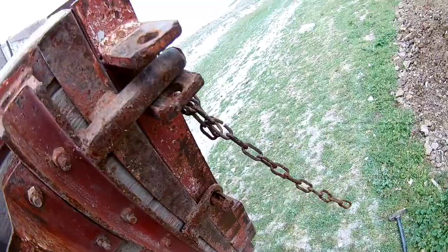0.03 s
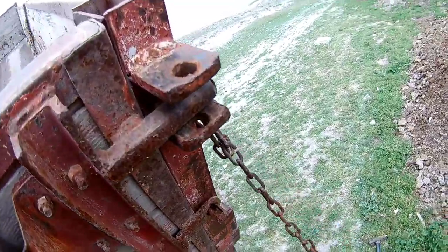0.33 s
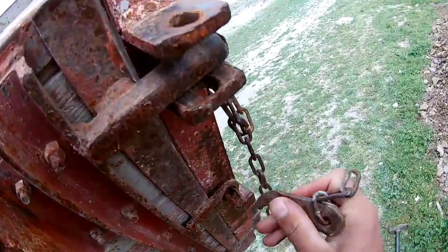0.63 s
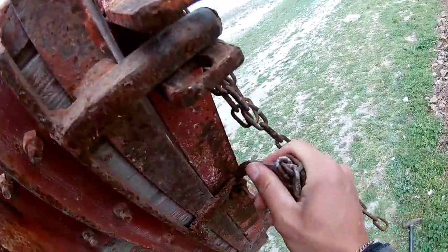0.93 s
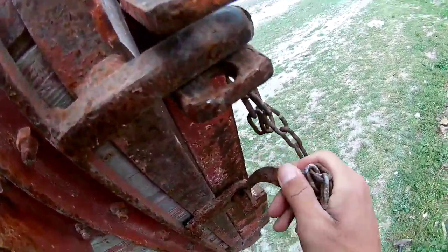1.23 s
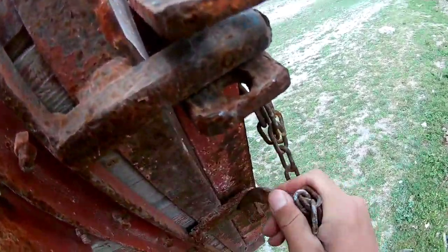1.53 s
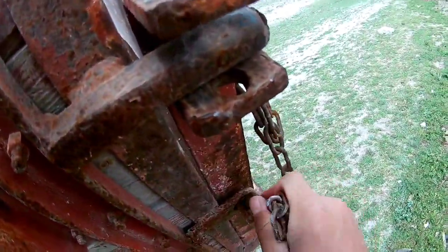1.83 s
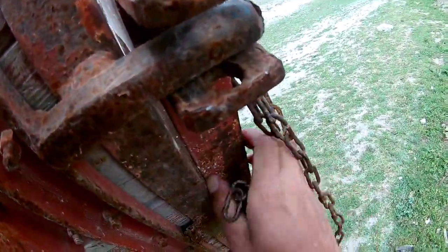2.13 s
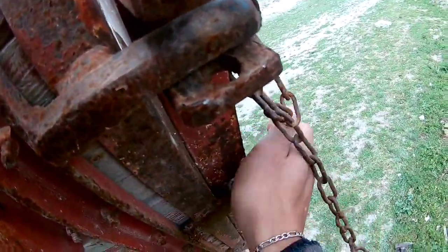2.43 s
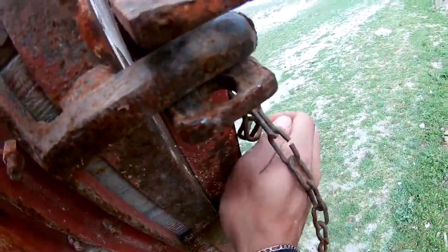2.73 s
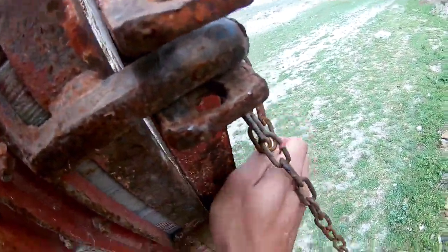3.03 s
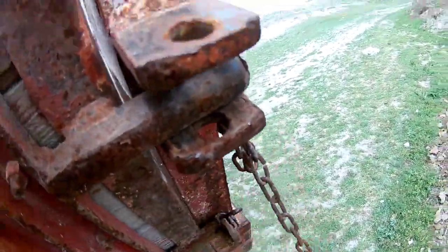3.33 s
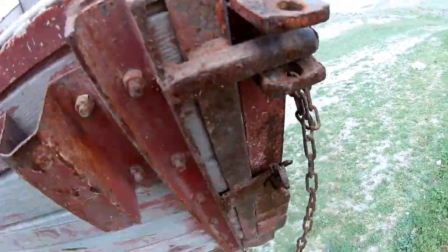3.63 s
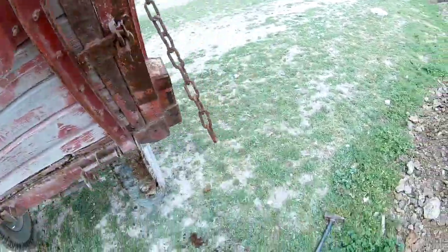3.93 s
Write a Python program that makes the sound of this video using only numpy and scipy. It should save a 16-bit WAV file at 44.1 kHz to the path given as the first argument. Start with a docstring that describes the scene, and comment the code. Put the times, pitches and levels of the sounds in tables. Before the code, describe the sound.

A rusty hook and chain clank against a steel trailer, close by outdoors. Links clink faintly at first, then knocks begin near 0.9 seconds, with sharp ringing clanks at 1.7 and 2 seconds. Gritty scrapes and ticks follow, then duller knocks from 2.7 to 3.1 seconds and a last clink at 3.6. Wind buffets the microphone throughout, thumping hardest near the end, while a distant engine idles faintly.

```python
"""Loose chain links clink faintly in the wind, outdoors at a steel farm trailer.
Close to the microphone, a rusty hook on the chain is worked into its fastening:
it knocks and scrapes on the frame, which rings. Gusts buffet the microphone
throughout, and an engine idles some way off."""
import sys
import numpy as np
from scipy import signal
from scipy.fft import rfft, irfft
from scipy.io import wavfile

SR = 44100
rng = np.random.default_rng(int(sys.argv[2]) if len(sys.argv) > 2 else 0)


def to_wav(sig):
    """Store sig (one row per channel, or 1-D mono) as 16-bit WAV at the path in sys.argv[1].

    Samples outside -1..1 are clipped; the rate is SR.
    """
    pcm = np.clip(np.atleast_2d(sig), -1, 1) * 32767
    pcm = np.round(pcm).astype(np.int16)
    wavfile.write(sys.argv[1], SR, pcm.T)  # frames by channels


N = 176400
T = np.arange(N) / SR
RING_T = T[:N // 6]  # time within one contact's sound


# Hook on the trailer frame, close by: start_s, body_db, ring_db, bite_db, air_db
HOOK_KNOCKS = [(0.8904, -35.5, -30, -44, -70), (1.137, -33, -33.5, -54, -88),
               (1.4691, -41.5, -38.5, -44, -63), (1.6909, -27, -19.5, -25, -56),
               (1.756, -33, -40.5, -38, -53), (1.803, -41, -48, -52.5, -85), (1.981, -51, -38, -45, -79),
               (1.9982, -37, -18, -22.5, -42.5), (2.0005, -25.5, -26.5, -23.5, -49),
               (2.347, -52, -45.5, -42.5, -61), (2.523, -50, -49, -54.5, -66.5),
               (2.622, -50.5, -48.5, -53.5, -71.5), (2.727, -27.5, -28.5, -44, -64),
               (2.7342, -24.5, -29, -37, -57), (2.866, -25, -31.5, -38, -58),
               (2.9172, -33, -32.5, -44, -71), (2.9235, -20, -27.5, -36, -54.5),
               (2.932, -27, -31, -40, -77), (3.066, -48.5, -51, -51, -69),
               (3.1215, -26, -32.5, -42.5, -56.5)]
# The hook sings on after knocks; the last row is a short chain clink near 3 kHz,
# sounding with the last rust tick: start_s, pitch_hz, level_db, t60_s
SINGLE_MODES = [(.892, 1722, -40, .3), (1.138, 1722, -37, .36), (1.14, 6490, -79, 1.2),
                (1.471, 1722, -43, .4), (1.692, 1722, -28.5, .24), (1.692, 12580, -47, .06),
                (1.757, 12580, -47, .07), (2.001, 1722, -29, .2), (2.001, 1135, -22, .06),
                (2.868, 1722, -28, .13), (2.868, 782, -41, .3), (3.124, 3424, -60, .45),
                (3.639, 3010, -32, .018)]
def hook():
    """The hook knocks against the frame and sometimes sings on; its chain gives one last short clink."""
    out = np.zeros(N)
    for start_s, *levels_db in HOOK_KNOCKS:
        add(out, start_s, clank(*levels_db))
    for start_s, pitch_hz, level_db, t60_s in SINGLE_MODES:
        add(out, start_s, ring([(pitch_hz, level_db, t60_s)], spread_db=0))
    return out


# Bands of one blow, from body up to air: low_hz, high_hz, trim_db, crash_t60_s, tail_db, tail_t60_s
BLOW_BANDS = [(425, 970, -5.5, 0.1, -4.5, 0.56), (990, 1440, -3, .06, -9, 0.29),
              (1450, 2270, -2.5, 0.049, -15.5, .28), (2350, 3700, -11.5, 0.049, -20.5, 0.19),
              (3500, 4400, -3.5, 0.031, -22, 0.3), (4334, 6500, -9.5, 0.02, -27.5, .2),
              (8150, 13400, -1.5, .035, -25.5, .15)]
# Modes of the hook and steel frame: pitch_hz, relative_db, t60_s
FRAME_MODES = [(468, -8, .15), (542, -10, .3), (590, -6, .12), (779, -6, .3), (845, -6, .09), (920, -8, .2),
               (1140, -3, .08), (1228, -5, .05), (1314, -7, .06), (1495, -9, .1), (1640, -6, .05),
               (1722, -1, .09), (1960, -3, .06), (2160, -6, .06), (2454, -2, .055), (2677, -7, .08),
               (2841, -7, .075), (3850, -3, .035), (3966, 0, .045), (4070, -3, .035), (4911, -9, .07),
               (11000, -5, .03), (12580, -5, .04)]
def clank(body_db, ring_db, bite_db, air_db, swell_s=0.001554, chatter_s=0.0011, crash_db=-1):
    """One blow: rusty faces chatter briefly, then clear modes ring over a crash of dense ones."""
    out = np.zeros(len(RING_T))
    swell = 1 - np.exp(-RING_T / swell_s)
    levels_db = body_db, body_db, ring_db, ring_db, bite_db, bite_db, air_db
    for level_db, blow_band in zip(levels_db, BLOW_BANDS):
        low_hz, high_hz, trim_db, crash_t60_s, tail_db, tail_t60_s = blow_band
        dense = rms_one(band(rng.standard_normal(len(RING_T)), low_hz, high_hz, order=3))
        decay = fade(crash_t60_s, hold_s=chatter_s) + from_db(tail_db) * fade(tail_t60_s)
        modes = [mode for mode in FRAME_MODES if low_hz < mode[0] < high_hz]
        clear = ring(modes, spread_db=7, shift_bandwidths=0.35)  # each contact loads them differently
        blow = swell * (clear + from_db(crash_db) * dense * decay)
        attack_rms = np.std(blow[:SR // 60])
        out += from_db(level_db + trim_db) * blow / attack_rms
    return out


# The hook drags over rust, close by: start_s, end_s, level_db, relative_bite_db
HOOK_SCRAPES = [(1.905, 1.987, -45.5, -16.5), (2.065, 2.117, -36, -13.5), (2.164, 2.327, -52, -12),
                (2.344, 2.417, -42.5, -7.5), (2.751, 2.812, -45, -6), (2.87, 2.913, -45.5, -4.5),
                (2.935, 2.995, -52, -9), (3.131, 3.172, -62, -9)]
def scraping(contacts=4, grains_per_s=450, spread_db=3.5, rise_s=0.02):
    """Grains of rust catch and slip at several contact points; each slip is a tiny damped blow."""
    out = np.zeros(N)
    for start_s, end_s, level_db, bite_db in HOOK_SCRAPES:
        size = int((end_s - start_s) * SR)
        pressure = np.minimum(T[:size] / rise_s, 1)
        drag = 0
        for _ in range(contacts):
            blow = clank(body_db=3.5, ring_db=0, bite_db=bite_db, air_db=bite_db - 19.5)
            damped = blow * fade(t60_s=0.04)  # pressed faces damp each other
            slips = rng.random(size) < grains_per_s / contacts / SR
            grains = slips * rng.choice([-1, 1], size) * from_db(spread_db * rng.standard_normal(size))
            drag = drag + signal.fftconvolve(grains * pressure, damped)
        drag_rms = np.sqrt(np.sum(drag ** 2) / size) + 1e-9
        add(out, start_s, from_db(level_db) * drag / drag_rms)
    return out


# Link taps link, close by: start_s, level_db, upper_relative_db, pitch_hz, t60_s
LINK_CLINKS = [(.026, -60.5, 1, 5050, 0.089), (.074, -60.5, 13, 5170, 0.044), (.374, -45, -1, 5120, 0.046),
               (.522, -53.5, -8, 5100, 0.029), (.625, -44, -14, 5060, 0.045),
               (0.632, -38.5, 0.5, 5075, 0.06), (.708, -59, -12, 5070, .05), (0.808, -55, -12, 5080, 0.068),
               (.878, -40.5, -9, 5130, 0.028), (0.89, -24, -15, 5070, 0.016),
               (.937, -27.5, -9, 5280, 0.011), (1.137, -31, -28, 5060, 0.025),
               (1.152, -54, -5, 5600, 0.023)]
# Modes of a link, three lower then two upper: pitch_ratio, relative_db, t60_ratio
LINK_MODES = [(1, -1, 1), (1.016, -8, .4), (1.15, -15, .3), (1.625, -15, 1.1), (2.067, -13, .8)]
# Dry ticks of rusty metal: start_s, level_db
RUST_TICKS = [(1.529, -49.5), (2.027, -36), (2.072, -50), (2.097, -39), (2.11, -42), (2.127, -34),
              (2.216, -48), (2.271, -49), (2.367, -37.5), (2.39, -39), (2.404, -46.5), (2.549, -47.5),
              (2.799, -45), (2.959, -38), (3.638, -30)]
def chain(click_db=-26):
    """Free links click and ring as they tap each other; dry ticks of rusty metal sound among them."""
    out = np.zeros(N)
    for start_s, level_db, upper_db, pitch_hz, t60_s in LINK_CLINKS:
        modes = [(pitch_hz * ratio, db, t60_s * t60_ratio) for ratio, db, t60_ratio in LINK_MODES]
        lower = ring(modes[:3], spread_db=0.5)
        upper = from_db(upper_db) * ring(modes[3:], spread_db=0.5)
        click = from_db(click_db + upper_db / 2) * tick()
        add(out, start_s, from_db(level_db) * (lower + upper + click))
    for start_s, level_db in RUST_TICKS:
        add(out, start_s, from_db(level_db) * tick())
    return out


def tick(rise_s=0.00035, air_db=-13.5):
    """A dry contact: a few milliseconds of bright crackle."""
    white = rng.standard_normal(len(RING_T))
    crackle = rms_one(band(white, 2215, 5480, order=3))
    air = from_db(air_db) * rms_one(band(white, 8500, 13500))
    return (crackle + air) * (1 - np.exp(-RING_T / rise_s)) * fade(t60_s=0.01)


# The chain swings near the microphone: start_s, end_s, level_db
CHAIN_JINGLES = [(0, 0.087, -63.5), (0.198, 0.248, -66), (0.374, .455, -64.5), (.58, 0.832, -74)]
def jingling(contacts_per_s=85, spread_db=5.5):
    """The swinging chain rustles with many faint, bright contacts."""
    out = np.zeros(N)
    for start_s, end_s, level_db in CHAIN_JINGLES:
        for contact_s in rng.uniform(start_s, end_s, int((end_s - start_s) * contacts_per_s)):
            bright = rms_one(band(rng.standard_normal(len(RING_T)), 4730, 8360, order=1))
            gain = from_db(level_db + spread_db * rng.standard_normal())
            add(out, contact_s, gain * bright * fade(t60_s=0.01))
    return out


# Faint squeaks from the nearby chain: start_s, length_s, level_db
LINK_SQUEAKS = [(.005, 0.057, -64), (0.366, 0.024, -51), (0.391, 0.062, -61)]
def squeaks(pitch_hz=2525, width_hz=170, edge_s=0.0066):
    """Dry links rub as the chain swings, exciting one narrow resonance."""
    rub = rms_one(band(rng.standard_normal(N), pitch_hz - width_hz / 2, pitch_hz + width_hz / 2))
    envelope = np.zeros(N)
    for start_s, length_s, level_db in LINK_SQUEAKS:
        inside_s = np.minimum(T - start_s, start_s + length_s - T)
        envelope += from_db(level_db) * np.clip(inside_s / edge_s, 0, 1)
    return rub * envelope


# Gusts right on the microphone: time_s, level_db
WIND_GUSTS = [(0.0, -48), (0.7, -42), (0.85, -28), (0.89, -36), (1.0, -28), (1.07, -39), (1.14, -27),
              (1.22, -24), (1.25, -42.5), (1.35, -40.5), (1.38, -38.5), (1.49, -35.5), (1.55, -30.5),
              (1.6, -40), (1.89, -31), (1.93, -43), (1.98, -21.5), (2.03, -36.5), (2.1, -22), (2.38, -40),
              (2.44, -25.5), (2.51, -34), (2.565, -26.5), (2.61, -20.5), (2.73, -34.5), (2.77, -25.5),
              (2.86, -27.5), (3.01, -31.5), (3.03, -22), (3.15, -32), (3.32, -38.5), (3.39, -19.5),
              (3.41, -21), (3.46, -42), (3.59, -48), (3.61, -21.5), (3.7, -20), (3.93, -39), (4.0, -31.5)]
# Colour of their rumble: frequency_hz, relative_density_db
WIND_SPECTRUM = [(20, 0.5), (40, 2.5), (80, 0), (140, -2.5), (250, -9), (450, -19.5), (900, -32),
                 (1800, -47.5), (4000, -89.5)]
# Eddies that hit the microphone: time_s, unfiltered_peak_db
EDDY_THUMPS = [(.811, -20.5), (1.144, -18), (1.211, -22), (2.09, -17), (2.162, -15.5), (3.03, -16.5),
               (3.392, -11.5), (3.624, -11.5), (3.672, -9), (3.712, -9.5), (3.852, -13)]
def wind(trim_db=0.5, flutter_db=2, bright_from_hz=600, brightening=0.4, thump_rise_s=0.00073):
    """Air buffets the microphone: a lumpy rumble that brightens in gusts, with thumps of pressure."""
    gust_db = np.interp(T, *np.transpose(WIND_GUSTS))
    rumble = noise(WIND_SPECTRUM) * rms_one(from_db(flutter_db * drift(rate_hz=27)))
    upper = signal.sosfilt(signal.butter(1, bright_from_hz, "high", fs=SR, output="sos"), rumble)
    upper_gain = from_db(brightening * (gust_db - gust_db.mean()))
    out = from_db(trim_db + gust_db) * (rumble + upper * (upper_gain - 1))
    push = RING_T / thump_rise_s * np.exp(1 - RING_T / thump_rise_s)
    thump = band(push, 49, 1200)
    for time_s, peak_db in EDDY_THUMPS:
        add(out, time_s - thump_rise_s, from_db(peak_db) * thump)
    return out


# Engine clatter, heard from some way off: frequency_hz, relative_density_db
CLATTER_SPECTRUM = [(60, 2), (170, 9.5), (290, -0.5), (480, -6.5), (800, -7), (1350, -6), (1800, -15.5),
                    (2200, -21), (3000, -38)]
# The hum under it: pitch_hz, level_db
ENGINE_TONES = [(43.1, -45.5), (113.0, -62), (269.2, -55), (393.0, -53.5)]
def engine(firing_hz=20.6, first_firing_s=0.004, throb_db=3.5, clatter_db=-44.5, hum_trim_db=-1.5):
    """A distant idle: clatter that swells on each firing, over wavering tones."""
    throb = from_db(throb_db * np.cos(2 * np.pi * firing_hz * (T - first_firing_s)))
    clatter = noise(CLATTER_SPECTRUM) * rms_one(throb)
    hum = np.zeros(N)
    for pitch_hz, level_db in ENGINE_TONES:
        waver = 1 + 0.2 * drift(rate_hz=3.5)
        phase = 2 * np.pi * pitch_hz * T + 4 * drift(rate_hz=9)
        hum += from_db(level_db) * np.sqrt(2) * waver * np.sin(phase)
    return from_db(clatter_db) * clatter + from_db(hum_trim_db) * hum


def ring(modes, spread_db, shift_bandwidths=0):
    """Struck modes with random strength and sign; any pitch shift is wider for damped ones."""
    out = np.zeros(len(RING_T))
    for centre_hz, level_db, t60_s in modes:
        width_hz = np.log(1000) / (np.pi * t60_s)
        pitch_hz = centre_hz + shift_bandwidths * width_hz * rng.standard_normal()
        gain = rng.choice([-1, 1]) * from_db(level_db + spread_db * rng.standard_normal())
        out += gain * fade(t60_s) * np.sin(2 * np.pi * pitch_hz * RING_T)
    return out


def fade(t60_s, hold_s=0):
    """Hold, then fall by 60 dB every t60_s."""
    return np.exp(-np.log(1000) * np.maximum(RING_T - hold_s, 0) / t60_s)


def noise(spectrum):
    """Unit-rms noise with the given spectrum, falling away beyond its ends."""
    hz, db = np.transpose(spectrum)
    bins_hz = np.maximum(np.fft.rfftfreq(N, 1 / SR), 1)
    skirts = np.minimum(bins_hz / hz[0], 1) ** 2 * np.minimum(hz[-1] / bins_hz, 1) ** 2
    colour = from_db(np.interp(np.log(bins_hz), np.log(hz), db))
    return rms_one(irfft(rfft(rng.standard_normal(N)) * skirts * colour, N))


def drift(rate_hz):
    """Unit-rms random wander, mostly slower than rate_hz."""
    bins_hz = np.fft.rfftfreq(N, 1 / SR)
    return rms_one(irfft(rfft(rng.standard_normal(N)) / (1 + (bins_hz / rate_hz) ** 2), N))


def band(x, low_hz, high_hz, order=2):
    """Butterworth band-pass."""
    return signal.sosfilt(signal.butter(order, [low_hz, high_hz], "band", fs=SR, output="sos"), x)


def from_db(db):
    """Decibels to gain."""
    return 10 ** (np.asarray(db) / 20)


def rms_one(x):
    """Scale to unit rms."""
    return x / np.sqrt(np.mean(x ** 2) + 1e-20)


def add(out, start_s, sound):
    """Mix a sound in at start_s."""
    i = max(int(start_s * SR), 0)
    out[i:i + len(sound)] += sound[:N - i]


def scene():
    """Metalwork close by, wind on the microphone and an engine in the distance, in mono."""
    return (hook() + chain() + jingling() + squeaks() + scraping() + wind() + engine())[None]


# The microphone's own hiss: frequency_hz, relative_density_db
HISS_SPECTRUM = [(2000, -1), (3000, -2.5), (4000, 3), (6000, -5.5), (8000, -11), (15000, -8.5)]
def record(dry, notch_hz=7990, hiss_db=-75, cutoff_hz=15800):
    """The microphone has a notch in the treble and a faint hiss; the top is cut."""
    notched = signal.lfilter(*signal.iirnotch(notch_hz, Q=11, fs=SR), dry)
    hiss = from_db(hiss_db) * noise(HISS_SPECTRUM)
    low_pass = signal.ellip(10, 0.2, 80, cutoff_hz, fs=SR, output="sos")
    return signal.sosfilt(low_pass, notched + hiss)


dry = scene()
out = record(dry)
to_wav(out)
```